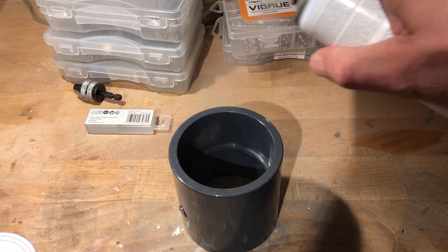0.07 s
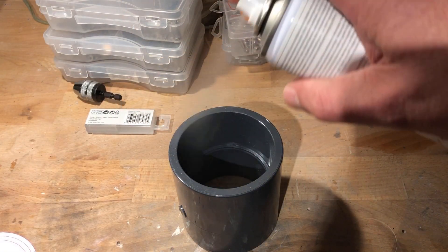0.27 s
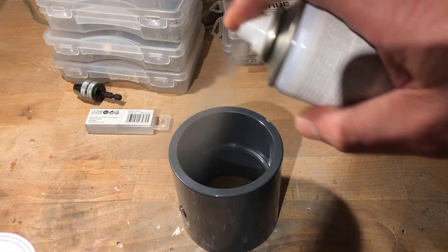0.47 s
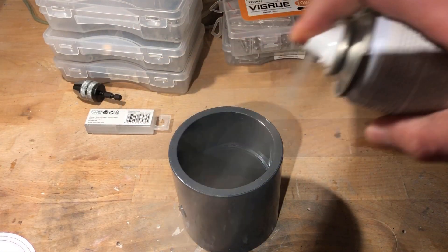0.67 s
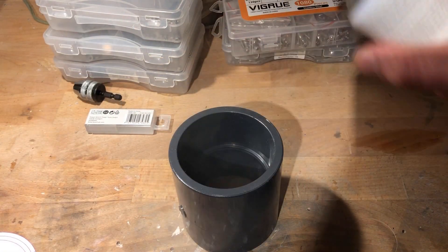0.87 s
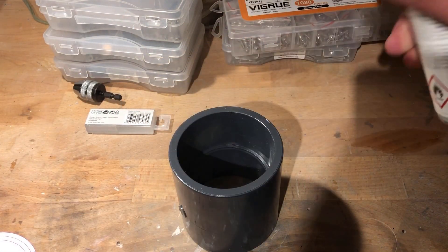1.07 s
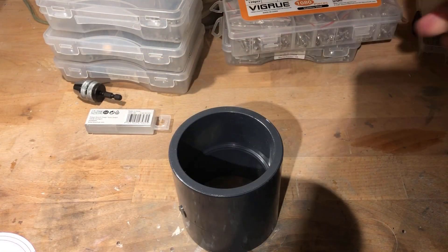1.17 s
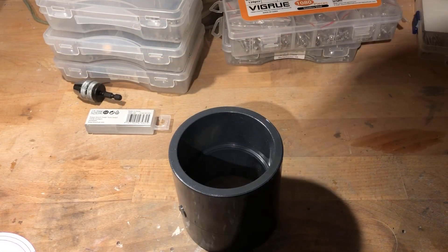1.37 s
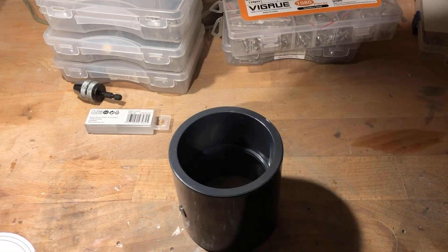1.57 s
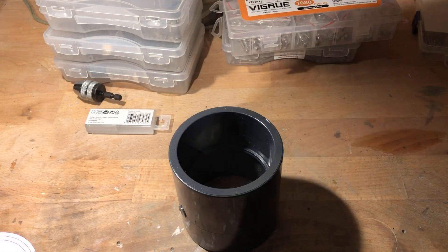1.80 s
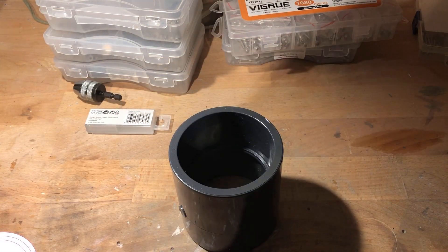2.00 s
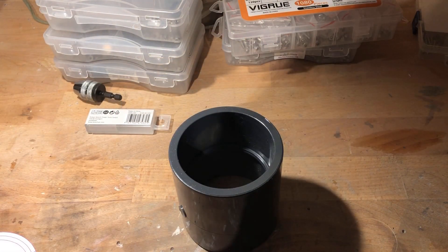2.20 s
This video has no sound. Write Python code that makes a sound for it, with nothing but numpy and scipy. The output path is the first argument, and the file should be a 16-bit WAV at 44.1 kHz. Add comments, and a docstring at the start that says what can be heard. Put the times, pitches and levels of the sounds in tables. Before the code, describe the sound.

Close small-microphone sound of an aerosol can spraying steadily for under a second, cutting off sharply with a short room tail, then quiet rubbing, clicks and low rumbles before a woody knock on the bench.

```python
"""Spray can in a small room

A hand-held spray can hisses into a short pipe on a wooden workbench: noise coloured by the aim, plus its bounces.
The valve shuts, the small room rings out, and a faint fizz of shaped noise dies away. Fingers rub (grainy noise)
and tick (short rings) on the can, a thin whistle wavers (narrow noise), and something is dragged (two noise drones).
The bench rumbles with low noise and soft bumps, and the can is set down with a crack and ringing bench modes."""
import sys
import numpy as np
from scipy import signal
from scipy.fft import rfft, irfft, next_fast_len
from scipy.io import wavfile
from scipy.ndimage import uniform_filter1d, map_coordinates

SR = 44100
rng = np.random.default_rng(int(sys.argv[2]) if len(sys.argv) > 2 else 0)


def to_wav(s):
    """Save 16-bit WAV."""
    ch = np.atleast_2d(s).T  # columns
    pcm = np.round(np.clip(ch, -1, 1) * 32767)  # PCM
    wavfile.write(sys.argv[1], SR, pcm.astype(np.int16))


def gain_from_decibels(decibels):
    """Convert decibel values to linear amplitude factors."""
    exponent = np.asarray(decibels, float) / 20
    return 10 ** exponent


N = 99048  # length in samples
T = np.arange(N) / SR  # time in seconds

# the valve and the aim of the can: start_s [s], level_db [dB], turn toward the microphone [0-1]
VALVE = [(0, -27.5, 0.12), (.2, -27.5, 0.14), (.4, -26.5, 0.67), (.6, -26, 0.87), (.82, -25, .99),
         (.842, -27.5, 0.6), (.858, -29.5, 0.4), (.878, -53, 0.7), (.9, -77, 0.9)]
VALVE_SHUT_S = VALVE[-1][0]


def evened(x):
    """Scales a sound to an rms (average strength) of 1."""
    return x / np.sqrt(np.mean(x ** 2) + 1e-20)


def read(points, hz):
    """Reads a table of (Hz, value) at any frequency, along a logarithmic pitch scale."""
    f, value = np.transpose(points)
    return np.interp(np.log(hz + 1), np.log(f + 1), value)


def column(table, index):
    """One column of a table as a curve in time."""
    rows = np.array(table, float)
    return np.interp(T, rows[:, 0], rows[:, index])


def add(mix, s, sound):
    """Adds a short sound to the mix, starting at s seconds."""
    part = mix[round(s * SR):][:len(sound)]
    part += sound[:len(part)]


def coloured(x, points):
    """Filters a signal by a table of (Hz, dB)."""
    size = next_fast_len(N + 4096)
    gain = gain_from_decibels(read(points, np.fft.rfftfreq(size, 1 / SR)))
    return irfft(rfft(x, size) * gain, size)[..., :N]


def noise(points, patch_db):
    """Coloured noise of rms 1 with drifting louder and softer patches in time and pitch."""
    a, b, patches = rng.standard_normal((N // 128 + 5, 257, 3)).T
    patches = uniform_filter1d(patches, size=6, axis=0)  # smooth over pitch
    patches = evened(uniform_filter1d(patches, size=14, axis=1))  # smooth over time
    spectrum = (a + 1j * b) * gain_from_decibels(patch_db * patches)
    patchy = signal.istft(spectrum, nperseg=512, noverlap=384)[1][:N]
    return evened(coloured(patchy, points))


def flicker(hz):
    """Random wandering of rms 1, mostly slower than the given rate."""
    slow = signal.butter(2, hz, fs=SR, output="sos")
    return evened(signal.sosfilt(slow, rng.standard_normal(N)))


def resonate(x, hz, width_hz):
    """A resonance of gain 1 at its centre, whose pitch may follow a curve."""
    turn = np.exp(2j * np.pi * np.cumsum(hz * np.ones(len(x))) / SR)
    r = np.exp(-np.pi * width_hz / SR)
    # shift the pitch down to zero, smooth, and shift it back up
    return 2 * (turn * signal.lfilter([1 - r], [1, -r], x / turn)).real


def jet():
    """Turbulent hiss that sputters, fills out as the can turns, and meets its own bounce off the bench."""
    # colour with the nozzle turned away, then turned near: pitch_hz [Hz], level_db [dB per Hz]
    jet_away = [(35, -56), (60, -23), (100, -23), (139, -16.5), (221, -14), (306, -11), (500, -23),
                (796, -12.5), (982, -21.5), (1240, -21), (1560, -21.5), (2070, -18), (2220, -18),
                (3880, -18.5), (4160, -16), (5010, -20.5), (5380, -11), (5900, -13), (7450, -12),
                (8570, -4), (15700, -4)]
    jet_near = [(35, -59.5), (60, -19.5), (98, -27), (136, -13), (167, -17), (344, -13.5), (536, -19),
                (796, -13), (1010, -22.5), (1160, -18), (1460, -22), (2440, -16), (3070, -21), (3620, -17),
                (4070, -13.5), (4360, -15), (5010, -13), (5500, -16.5), (6100, -5.5), (6480, -7.5),
                (7990, -3), (9400, -5.5), (15700, -1.5)]
    # the bounce off the bench as the hand moves: start_s [s], lag_ms [ms], share [0-1]
    bounce = [(0, .92, .2), (.16, .943, .2), (.3, .975, .17), (.4, 1.012, .38), (.47, 1.028, .38),
              (.58, 1.028, .36), (.66, 1.01, .32), (.76, .98, .38), (.9, .972, .44)]
    sputter_db, patch_db = 0.6, 1.17
    bounce_low_hz = 2200
    rim_lag_ms, rim_share = .78, .12  # a nearer, weaker bounce off the rim of the pipe
    blast_hz, blast_end_s, blast_fall_db_per_s = 900, 0.822, 251
    closing_s, closing_length_s = .851, 0.008
    closing_hz, closing_width_hz, closing_db = 5150, 180, -40

    turn = np.clip(column(VALVE, index=2), 0, 1)
    white = noise([(40, 0), (15800, 0)], patch_db)
    away = evened(coloured(white, jet_away))
    near = evened(coloured(white, jet_near))
    hiss = (1 - turn) * away + turn * near

    lag_samples = column(bounce, index=1) * SR / 1000
    late = map_coordinates(hiss, [np.arange(N) - lag_samples], order=5)
    high_pass = signal.butter(1, bounce_low_hz, "high", fs=SR, output="sos")
    late = signal.sosfiltfilt(high_pass, late)
    share = column(bounce, index=2)
    rim = rim_share * np.roll(hiss, round(rim_lag_ms * SR / 1000))
    hiss = (hiss + share * late + rim) / np.sqrt(1 + share ** 2)

    # the low blast fails first as the valve narrows
    blast = coloured(hiss, [(blast_hz, 0), (blast_hz * 1.5, -60)])
    blast_left = gain_from_decibels(-blast_fall_db_per_s * np.maximum(T - blast_end_s, 0))
    hiss = hiss - blast * (1 - blast_left)
    level = gain_from_decibels(column(VALVE, index=1) + sputter_db * flicker(hz=250)) * (T < VALVE_SHUT_S)

    # the closing valve whistles
    swell = np.exp(-.5 * ((T - closing_s) / closing_length_s) ** 2)
    closing = evened(resonate(white, closing_hz, closing_width_hz)) * swell
    return hiss * level + gain_from_decibels(closing_db) * closing


def knock():
    """The can lands: a quick crack, then the main modes of the bench top swell, then a blur of lesser ones."""
    # main modes of the bench top: pitch_hz [Hz], level_db [dB, relative], t60_s [s to fall 60 dB]
    bench = [(298, -17, 0.24), (372, -0.5, 0.1), (529, -1.5, 0.063), (760, -8, 0.069), (911, -12, 0.14),
             (1161, 2, 0.057), (1310, -22, 0.099), (1428, -6.5, 0.039), (1655, -20.5, 0.091),
             (1694, -33, 0.21), (2110, -39, 0.22), (5432, -46, 0.12)]
    # colour of the crack, then of the many close modes as a blur: pitch_hz [Hz], level_db [dB per Hz]
    crack_colour = [(200, -43), (500, 0), (2000, 4.5), (3700, -11), (4300, -26), (5500, -16), (6500, -24),
                    (15800, -31)]
    blur_colour = [(40, -39), (114, 3.5), (190, -5.5), (280, 9.5), (400, -3), (550, 4.5), (680, -1.5),
                   (930, 1), (1150, 2.5), (1450, -2.5), (1750, -11), (1950, -29), (2250, -21), (2550, -30),
                   (3000, -44), (5000, -70)]
    knock_s, modes_db = 2.152, -24
    crack_db, crack_t60_s = -40, 0.033
    blur_db, blur_t60_s = -35.5, 0.33
    crack_rise_s, modes_rise_s, blur_rise_s = .0015, .0065, .012

    t = np.maximum(T - knock_s, 0)

    def rise(length_s):
        """A smooth start from silence to full."""
        return np.sin(np.pi / 2 * np.minimum(t / length_s, 1))

    modes = np.zeros(N)
    for k, (hz, db, t60) in enumerate(bench):
        sign = (-1) ** k  # every other mode starts downward
        modes += sign * gain_from_decibels(db - 60 * t / t60) * np.sin(2 * np.pi * hz * t)
    crack = gain_from_decibels(crack_db - 60 * t / crack_t60_s) * noise(crack_colour, patch_db=0.0)
    blur = gain_from_decibels(blur_db - 60 * t / blur_t60_s) * noise(blur_colour, patch_db=2.5)
    swelling_modes = rise(modes_rise_s) ** 1.2 * gain_from_decibels(modes_db) * modes
    return rise(crack_rise_s) * crack + swelling_modes + rise(blur_rise_s) ** 2 * blur


def fingers():
    """Short grainy rubs, and ticks: a bright snap with one blurred ring."""
    # fingers sliding on the can: start_s [s], length_s [s], level_db [dB], tilt [dB per octave above 1000 Hz]
    rubs = [(1.269, 0.039, -63, 6), (1.384, 0.1, -68, 1.5), (1.415, 0.025, -78, 5),
            (1.591, 0.026, -73, -12), (1.471, 0.32, -72, -2.5), (1.747, 0.089, -70, -3),
            (1.85, 0.062, -68.5, -6.5), (2.001, 0.045, -72, -4)]
    # colour of the rubbing: pitch_hz [Hz], level_db [dB per Hz]
    rub_colour = [(410, -38), (700, -9), (1020, -6), (1210, -9.5), (1720, -2), (2090, -4.5), (2680, -7.5),
                  (3220, -5), (15800, -19.5)]
    # ticks on the can: start_s [s], ring_db [dB], ring_hz [Hz], snap_db [dB], t60_s [s to fall 60 dB]
    ticks = [(1.0248, -41.5, 1900, -59, 0.014), (1.3605, -60, 5140, -57, 0.053),
             (1.3658, -44.5, 2910, -53, 0.024), (1.367, -55, 6670, -68, 0.052),
             (1.378, -49.5, 3510, -47, 0.03), (1.38, -58.5, 1723, -60.5, 0.098),
             (1.596, -60, 1850, -78, 0.033), (1.776, -74, 14800, -75, .02),
             (1.787, -56, 4830, -57.5, 0.037), (1.788, -62, 5620, -70, 0.04),
             (1.802, -69, 8500, -74.5, .02), (1.872, -65, 3930, -70, .04), (2.006, -57.5, 1220, -75, .025),
             (2.02, -66.5, 2090, -76, .04), (2.021, -74, 15000, -78, .015), (2.064, -80, 14500, -76, .015),
             (2.155, -55, 5500, -67, 0.043)]
    snap_low_hz, snap_high_hz = 2286, 9800
    tick_rise_s = 0.00089

    out = np.zeros(N)
    grain = noise(rub_colour, patch_db=3.0) * gain_from_decibels(2.5 * flicker(hz=200))
    for s, length, db, tilt_db in rubs:
        stroke = np.sqrt(np.sin(np.pi * np.clip((T - s) / length, 0, 1)) + 1e-12)
        tilted = coloured(grain, [(1000, 0), (16000, 4 * tilt_db)])  # four octaves
        out = out + gain_from_decibels(db) * stroke * evened(tilted)

    t = np.arange(4000) / SR
    snap_band = signal.butter(1, [snap_low_hz, snap_high_hz], "band", fs=SR, output="sos")
    for s, db, hz, snap_db, t60 in ticks:
        snap, blur = rng.standard_normal((2, len(t)))
        snap = evened(signal.sosfilt(snap_band, snap))
        ring = np.sin(2 * np.pi * hz * t) + 0.24 * evened(resonate(blur, hz, width_hz=970))
        envelope = np.minimum(t / tick_rise_s, 1) * gain_from_decibels(-60 * t / t60)
        add(out, s, envelope * (gain_from_decibels(db) * ring + gain_from_decibels(snap_db) * snap))
    return out


def whistle():
    """A few fuzzy, broken lines of narrow noise that wander together in a halo of hiss."""
    # pitch of the main line: start_s [s], pitch_hz [Hz]
    pitch = [(1.3, 12500), (1.335, 12800), (1.36, 12800), (1.42, 12500), (1.49, 12250), (1.53, 13500),
             (1.575, 13550), (1.61, 14050), (1.635, 14230), (1.655, 13950), (1.69, 13100), (1.72, 12700),
             (1.8, 12500)]
    # the lines: ratio to the main pitch [times], level_db [dB, relative]
    line_table = [(1, 0), (1.052, -3), (.85, -16), (.8, -14), (.73, -16), (.65, -15)]
    # loudness of the whistle: start_s [s], level_db [dB]
    loudness = [(1.3, -100), (1.335, -86), (1.36, -88), (1.42, -90), (1.49, -88), (1.53, -84), (1.575, -84),
                (1.63, -74), (1.655, -79), (1.69, -87), (1.72, -87), (1.78, -89), (1.8, -100)]
    width_hz, waver_share, break_db = 45, .0015, 2.5
    halo_hz, halo_db = 1500, -10  # width and level of the halo

    white = rng.standard_normal(N)
    hz = column(pitch, index=1)
    lines = np.zeros(N)
    for ratio, db in line_table:
        broken_level = gain_from_decibels(db + break_db * flicker(hz=15))
        wavering_hz = ratio * hz * (1 + waver_share * flicker(hz=17))
        lines += broken_level * evened(resonate(white, wavering_hz, width_hz))
    halo = resonate(resonate(white, hz, halo_hz), hz, halo_hz)
    sound = lines + gain_from_decibels(halo_db) * evened(halo)
    sounding = (T > pitch[0][0]) * (T < pitch[-1][0])
    return sound * gain_from_decibels(column(loudness, index=1)) * sounding


def rumble():
    """Soft low bumps, as dying sines, over a bed of low noise in the bench top."""
    # colour of the bed: pitch_hz [Hz], level_db [dB per Hz]
    bed_colour = [(29, -47), (50, -8.5), (86, -26), (135, -3), (168, -17), (236, -0.5), (394, -10),
                  (578, -29), (716, -25), (1500, -31), (1950, -60), (3300, -120)]
    # loudness of the bed before its trim: start_s [s], level_db [dB]
    bed_level = [(1.55, -72), (1.568, -78), (1.594, -65), (1.682, -74), (1.706, -63), (1.766, -53.5),
                 (1.792, -61), (1.816, -57), (1.894, -58.5), (1.922, -65), (2.008, -55), (2.11, -71),
                 (2.125, -65)]
    # soft bumps through the bench top: start_s [s], level_db [dB], pitch_hz [Hz], t60_s [s to fall 60 dB]
    bumps = [(1.588, -57, 304, 0.15), (1.703, -52, 297, .2), (1.74, -51.5, 323.5, 0.19),
             (1.76, -57.5, 484, .1), (1.79, -53.5, 137, 0.36), (1.809, -67, 250, 0.18),
             (1.865, -53, 238.5, 0.3), (1.87, -60, 399, 0.19), (1.952, -53.5, 239, 0.3),
             (1.995, -52.5, 131, 0.24), (2.005, -52, 390, 0.12), (2.05, -54, 227, 0.19),
             (2.085, -61, 131, 0.68)]
    bed_trim_db, bump_rise_s = -2, 0.0055

    bed = gain_from_decibels(bed_trim_db + column(bed_level, index=1)) * noise(bed_colour, patch_db=1.3)
    out = bed * (T > bed_level[0][0])
    t = np.arange(SR // 4) / SR
    for s, db, hz, t60 in bumps:
        rise = np.sin(np.pi / 2 * np.minimum(t / bump_rise_s, 1)) ** 2
        add(out, s, rise * gain_from_decibels(db - 60 * t / t60) * np.sin(2 * np.pi * hz * t))
    return out


def drag():
    """Two fuzzy drones of something dragged: noise passed twice through a low and a high resonance."""
    # loudness of the two drones: start_s [s], low_db [dB], high_db [dB]
    levels = [(1.0, -87, -87), (1.022, -99, -69), (1.158, -86.5, -92), (1.186, -91, -78), (1.332, -71, -76),
              (1.374, -74, -71), (1.518, -73, -80), (1.774, -64.5, -80), (1.792, -81, -66),
              (1.836, -78, -92), (1.866, -67, -78), (1.95, -92, -101)]
    low_hz, low_width_hz = 433, 79
    high_hz, high_width_hz = 1850, 660

    low, high = rng.standard_normal((2, N))
    low = resonate(resonate(low, low_hz, low_width_hz), low_hz, low_width_hz)
    high = resonate(resonate(high, high_hz, high_width_hz), high_hz, high_width_hz)
    both = evened(low) * gain_from_decibels(column(levels, index=1)) + evened(high) * gain_from_decibels(column(levels, index=2))
    return both * (T > levels[0][0]) * (T < levels[-1][0])


def fizz():
    """The wet coat fizzes out: faint treble hiss that dies slowly once the valve is shut."""
    # colour of the fizz: pitch_hz [Hz], level_db [dB per Hz]
    fizz_colour = [(2500, -14), (5000, 4.5), (8000, -0.5), (12000, -5), (15800, -1.5)]
    level_db, t60_s = -65, 2.37
    t = T - VALVE_SHUT_S
    return noise(fizz_colour, patch_db=3.5) * gain_from_decibels(level_db - 60 * t / t60_s) * (t > 0)


def air():
    """Faint background noise, strongest in the low range, from start to end."""
    # colour of the background: pitch_hz [Hz], level_db [dB per Hz]
    air_colour = [(15, -47.5), (30, -9), (133, -2), (425, -7), (812, -11.5), (1120, -12.5), (1930, -20.5),
                  (2590, -21.5), (3390, -21.5), (5100, -21), (5900, -28), (9000, -28), (15800, -33.5)]
    level_db = -70
    return gain_from_decibels(level_db) * noise(air_colour, patch_db=0.7)


def room(x):
    """Diffuse tail of the room: half a second of noise, each band dying at its own speed."""
    # how long the room rings: pitch_hz [Hz], t60_s [s to fall 60 dB]
    ring_time = [(100, 0.68), (500, 0.56), (2000, 0.84), (4200, 0.366), (5300, 0.46), (6300, 0.39),
                 (8000, 0.38), (15000, 0.26)]
    hz, t, z = signal.stft(rng.standard_normal(SR // 2), SR, nperseg=128)
    decay = gain_from_decibels(-60 * t / read(ring_time, hz)[:, None])
    tail = signal.istft(z * decay, SR, nperseg=128)[1]
    return signal.fftconvolve(x, tail / np.linalg.norm(tail))[:N]


def widened(mid):
    """Makes left and right differ, mostly in the treble, by a scrambled copy in patches that come and go."""
    # side against mid inside a wide patch: pitch_hz [Hz], level_db [dB]
    width = [(40, -48.5), (4000, -52), (4300, 2), (5500, -0.5), (7000, -4.5), (9000, -4.5), (15800, -4)]
    # how many patches are wide in loud sound, then in quiet sound: pitch_hz [Hz], share [0-1]
    loud_share = [(4200, .99), (5600, .99), (6500, .55), (7500, .3), (8300, .09), (15800, .07)]
    quiet_share = [(4200, .02), (7000, .08), (10000, .2), (13000, .2), (15800, .08)]
    loud_db = -56  # compared with the strength of the slope, which favours treble

    hz, t, z = signal.stft(mid, SR, nperseg=512)
    turns = rng.random(z.shape)
    # one random lot for each patch of 6 time steps by 8 frequency steps
    lots = np.kron(rng.random((len(t) // 6 + 1, 33)), np.ones((6, 8)))[:len(t), :len(hz)].T
    slope_power = uniform_filter1d(np.gradient(mid) ** 2, size=1024)
    loud = np.interp(t, T, slope_power) > gain_from_decibels(2 * loud_db)
    share = np.where(loud, read(loud_share, hz)[:, None], read(quiet_share, hz)[:, None])
    scrambled = z * np.exp(2j * np.pi * turns)
    patches = scrambled * (lots < share) * gain_from_decibels(read(width, hz))[:, None]
    side = signal.istft(patches, SR, nperseg=512)[1][:N]
    return np.array([mid + side, mid - side])


def scene():
    """Mixes all sources; the jet, fingers and knock also ring in the room."""
    room_db, knock_room_db = -11.5, -15.5
    near = jet() + fingers()
    thud = knock()
    mid = near + gain_from_decibels(room_db) * room(near) + thud + gain_from_decibels(knock_room_db) * room(thud)
    return widened(mid + whistle() + rumble() + drag() + fizz() + air())


def low_pass(x):
    """Removes everything above the highest recorded frequency."""
    return signal.sosfilt(signal.butter(12, 16920, fs=SR, output="sos"), x)


def record(dry):
    """Colours the mix like the small microphone, then limits its treble."""
    # treble lift of the microphone: pitch_hz [Hz], level_db [dB]
    mic = [(40, 0), (13000, 0.5), (14800, 2.5), (15700, 1)]
    edge_hz = 15880
    edge = signal.firwin(511, edge_hz, window=("kaiser", 9), fs=SR)
    mix = signal.oaconvolve(coloured(dry, mic), edge[None], "same")
    return low_pass(mix)


dry = scene()
out = record(dry)
to_wav(out)
```